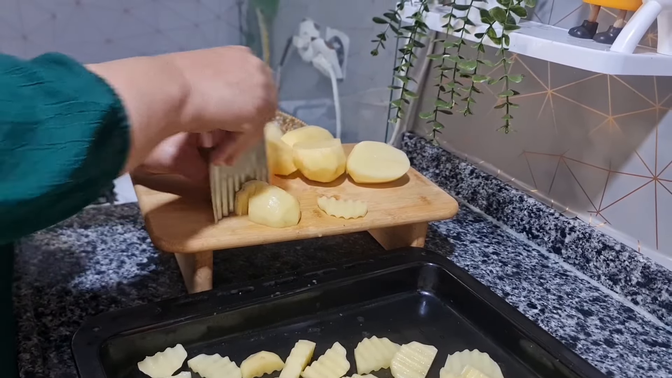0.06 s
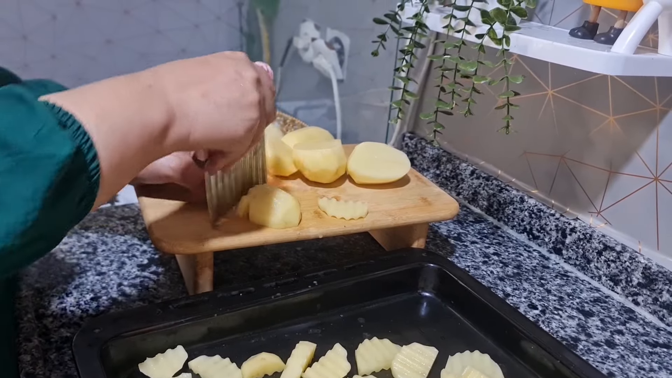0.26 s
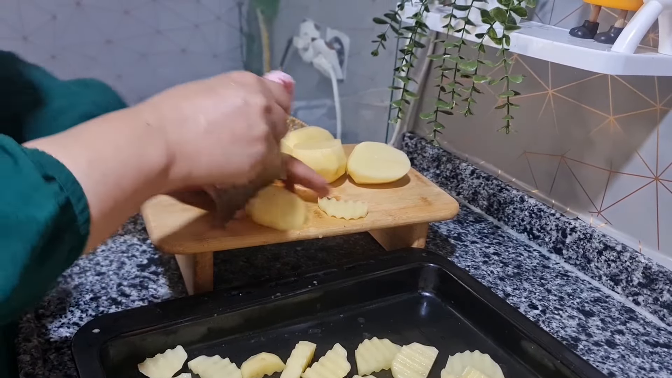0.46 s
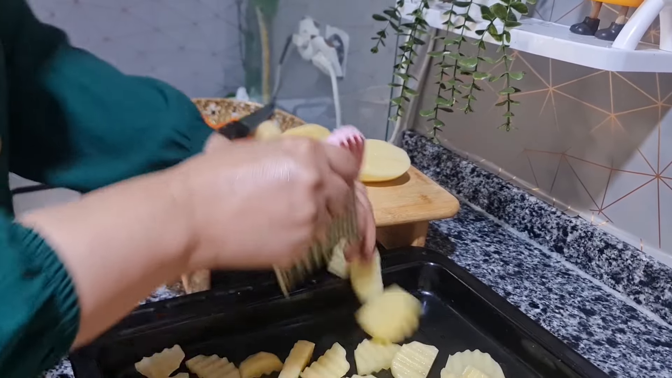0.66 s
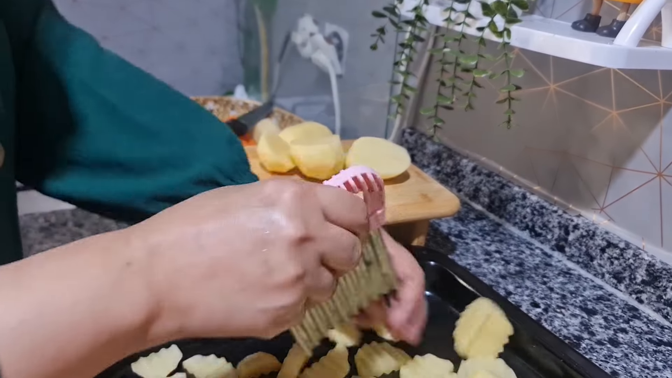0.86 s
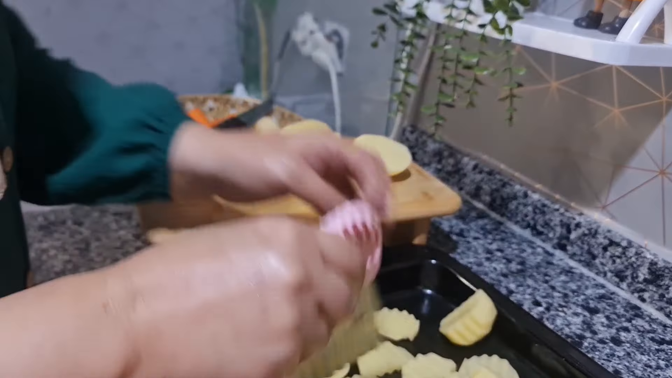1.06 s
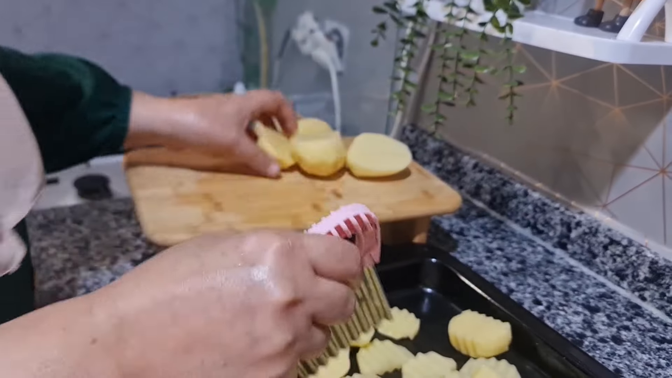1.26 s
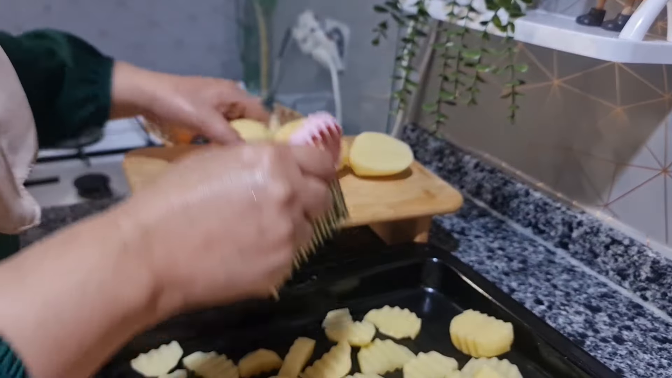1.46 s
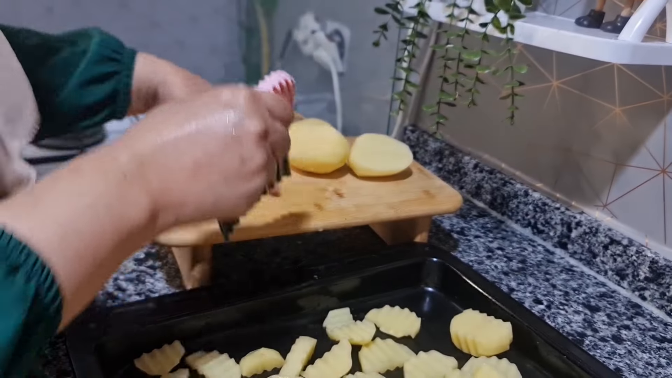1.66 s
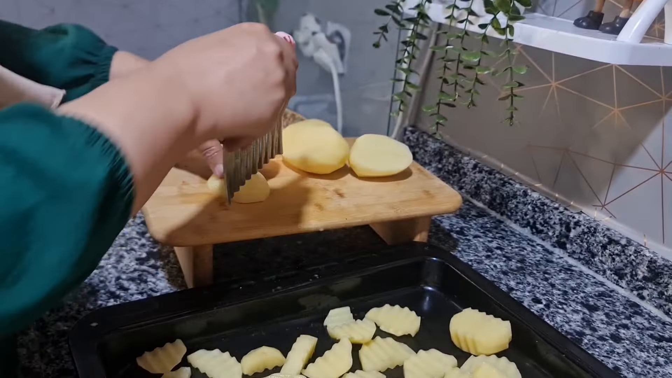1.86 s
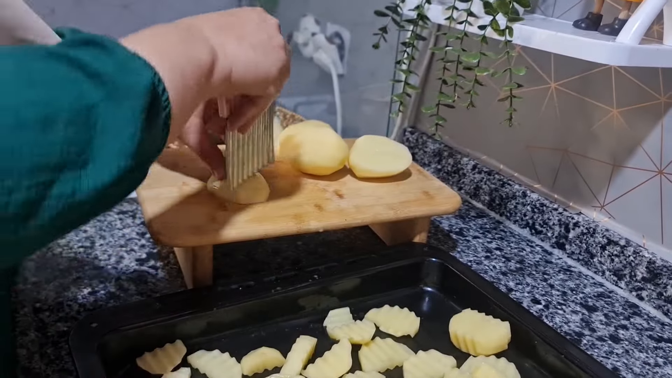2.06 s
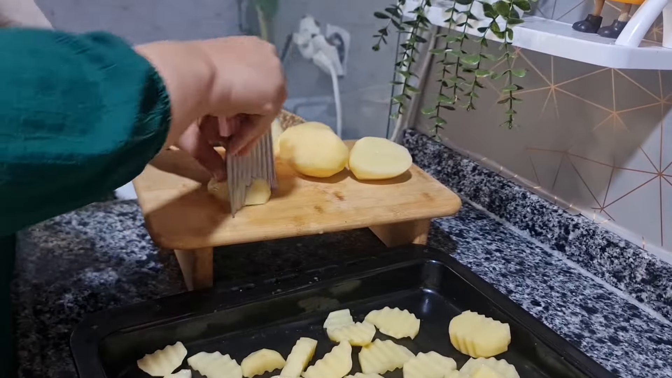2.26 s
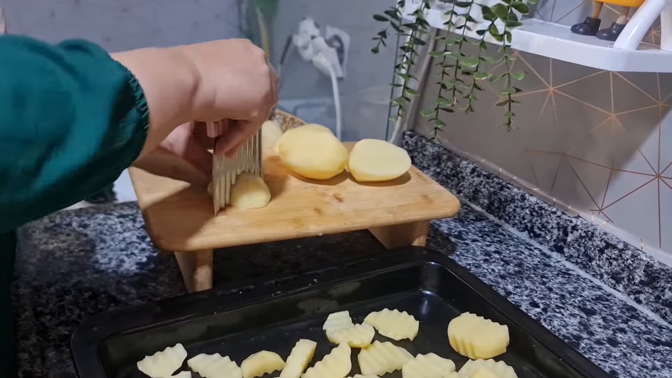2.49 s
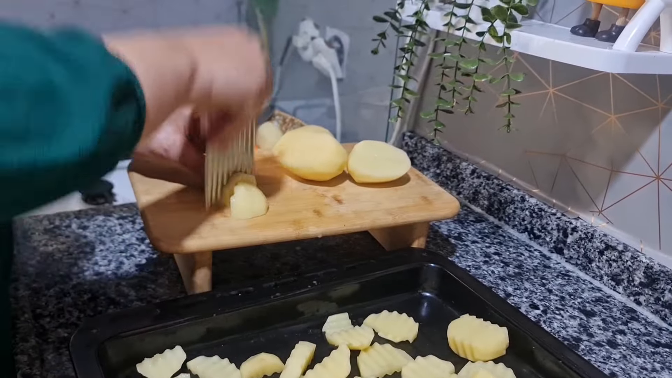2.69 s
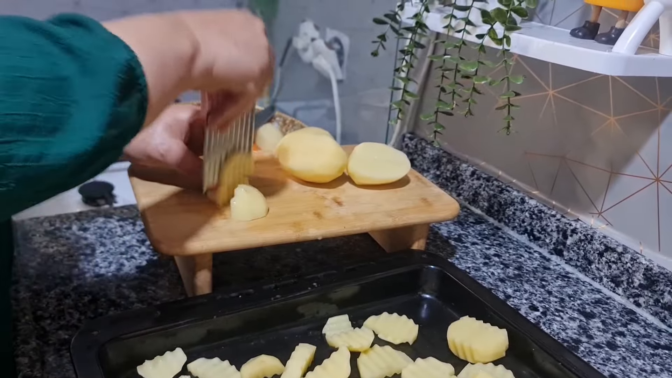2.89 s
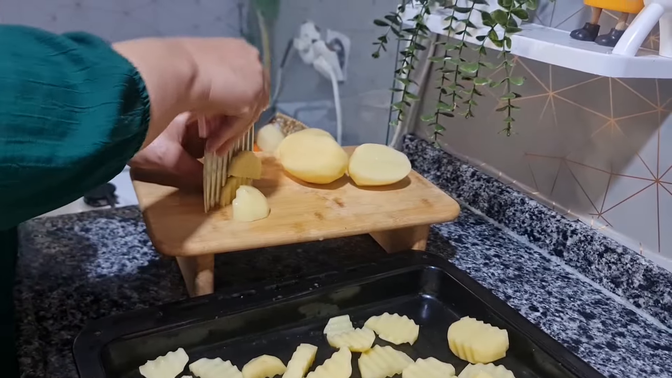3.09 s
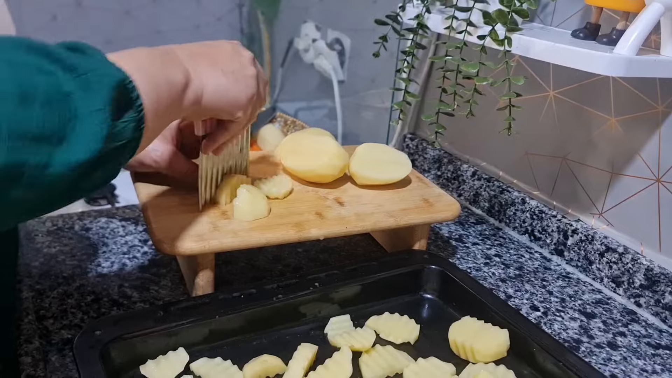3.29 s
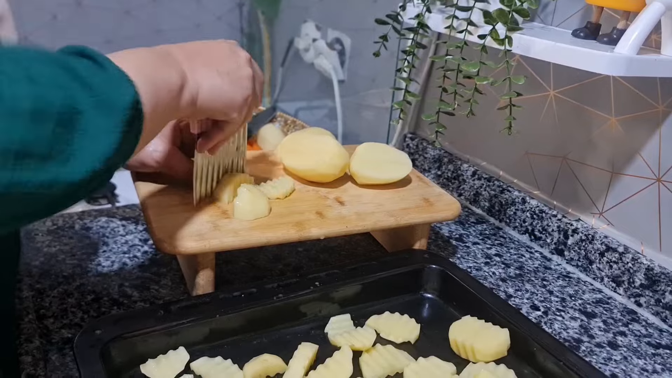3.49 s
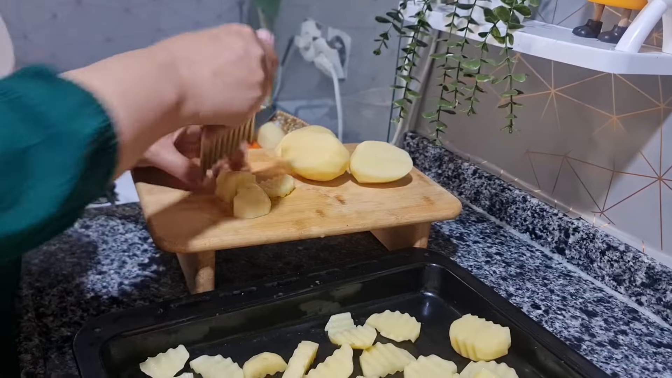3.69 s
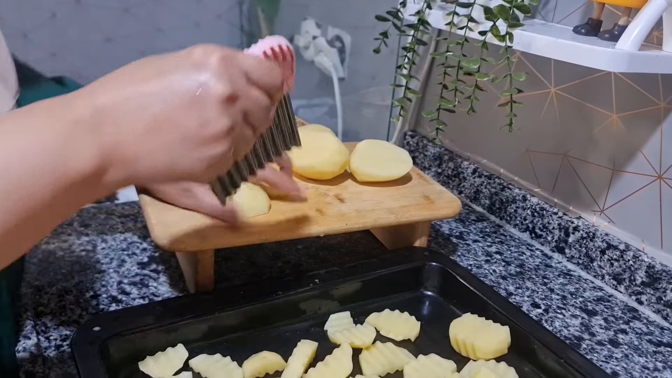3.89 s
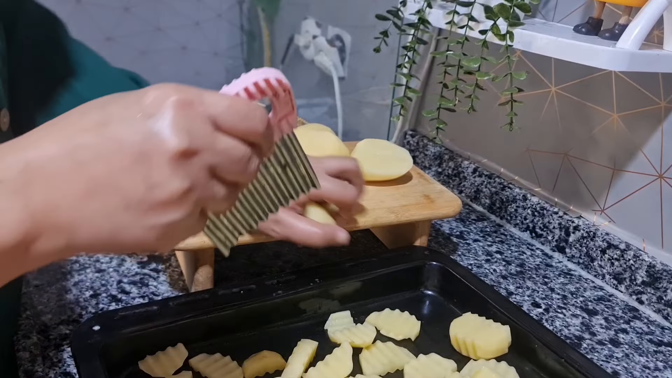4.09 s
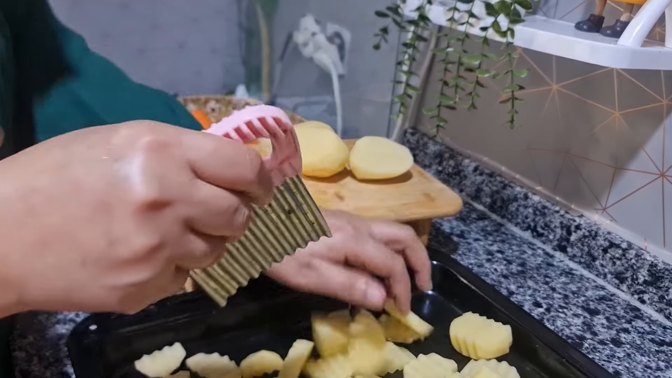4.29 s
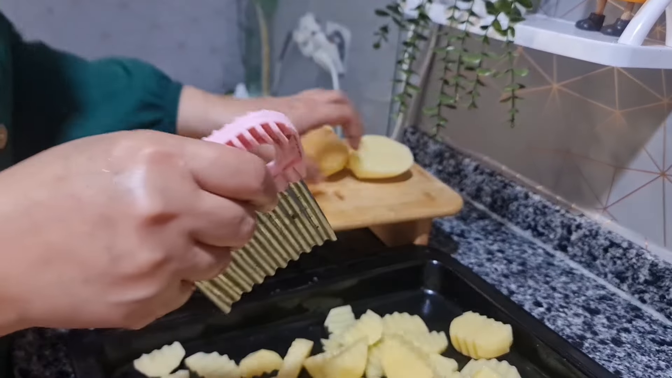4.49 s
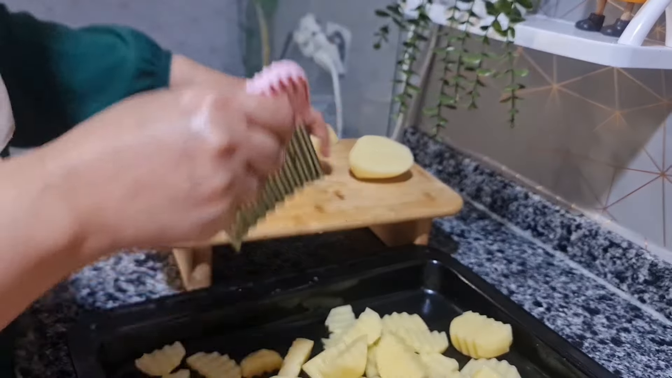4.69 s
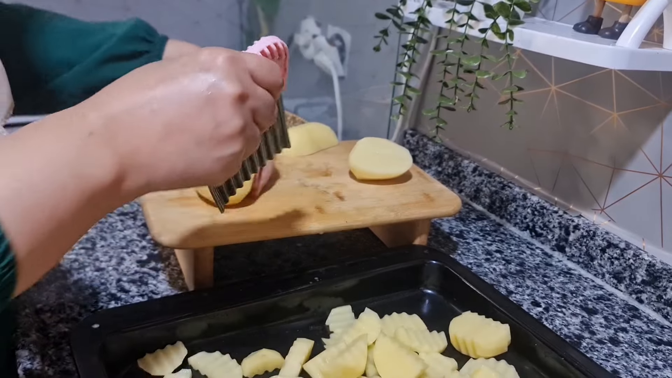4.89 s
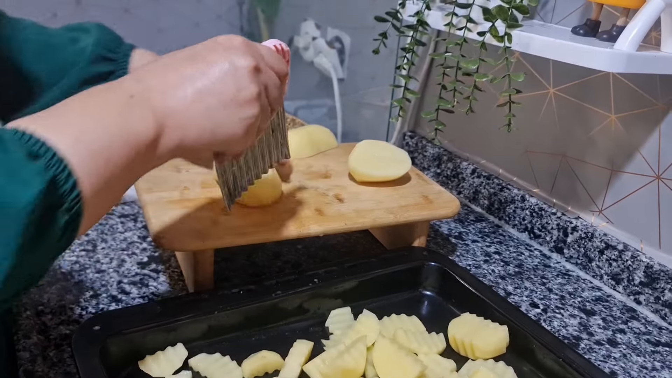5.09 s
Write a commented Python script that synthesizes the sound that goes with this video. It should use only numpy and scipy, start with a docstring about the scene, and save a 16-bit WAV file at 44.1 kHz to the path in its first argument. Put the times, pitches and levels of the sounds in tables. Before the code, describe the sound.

A crinkle cutter slices raw potato in six quick, crunchy cuts, each knocking on a wooden board in a small kitchen.

```python
"""Six quick, crunchy cuts, each ending in a knock on wood, sound in a small kitchen.
A crinkle cutter is slicing raw potato: the flesh tears in tiny bursts, then the blade hits
a wooden board that rings and rocks on its feet. Before and after, slices are scraped and
swept off the board and plop into a baking tray. A last, dull knock is the potato or cutter
being set down. Sleeves rustle over a faint hiss and rumble."""
import sys
import numpy as np
from scipy import signal
from scipy.fft import rfft, irfft, next_fast_len
from scipy.io import wavfile
from scipy.ndimage import uniform_filter1d, minimum_filter1d, map_coordinates

SR = 44100
rng = np.random.default_rng(int(sys.argv[2]) if len(sys.argv) > 2 else 0)


def to_wav(sig):
    """Store sig (one row per channel, or 1-D mono) as 16-bit WAV at the path in sys.argv[1].

    Samples outside -1..1 are clipped; the rate is SR.
    """
    pcm = np.clip(np.atleast_2d(sig), -1, 1) * 32767
    pcm = np.round(pcm).astype(np.int16)
    wavfile.write(sys.argv[1], SR, pcm.T)  # frames by channels


N = 227070
TIME = np.arange(N) / SR  # seconds since the scene began
AGE = np.arange(SR * 3 // 5) / SR  # seconds since a hit began

# Levels in dB are relative: filters and the mix shift them later. Fade time is the time to drop 60 dB.
# Knocks on the board: six end a cut, the last is the potato or cutter being set down. Each row: start
# in seconds, then level, extra wood tone, extra steel tone and left minus right, all in dB.
KNOCKS = [(2.2538, -19, 4, -12.5, 1), (2.5442, -22, 2, 0, 1), (2.8066, -18.5, -3, 2.5, 0.5),
          (3.0702, -21.5, -1.5, 3.5, 0.5), (3.3261, -20.5, -3, -5.5, 0), (3.5695, -20.5, 7.5, 0.5, 2.5),
          (5.0009, -28, 2, -20.5, 0)]
# The blade bites in and tears on. Each row: start in seconds, bite level in dB, crunch level in dB.
CUTS = [(2.207, -40.5, -32), (2.5, -36, -28.5), (2.767, -40.5, -25.5), (3.033, -38.5, -27),
        (3.294, -39, -30), (3.546, -51, -28.5)]
# Cutter and potato touch lightly on the board. Each row: start in seconds, level in dB.
TAPS = [(0.361, -44), (0.514, -49), (0.733, -44), (1.83, -48.5), (3.722, -41)]
# The cutter clacks as slices are shaken into the tray. Each row: start in seconds, level in dB.
CLACKS = [(-0.02, -32), (0.8165, -46.5), (0.9154, -39), (0.95, -37.5), (4.341, -47.5)]
# Short pitched sounds. Each row: start in seconds, level in dB, pitch in Hz, fade time in seconds.
BUMPS_AND_TICK = [(0.18, -61, 3100, 0.11), (0.734, -40, 275, 0.11), (0.764, -56, 1320, 0.057),
                  (0.819, -48, 2430, 0.025), (1.431, -40, 575, 0.1), (2.985, -47, 557, .13),
                  (3.015, -40.5, 750, 0.045), (3.253, -46.5, 507, .03), (3.496, -43.5, 530, 0.055),
                  (4.325, -43.5, 340, 0.14), (4.407, -48.5, 1090, .04), (4.434, -44.5, 1200, 0.045),
                  (4.656, -50.5, 474, 0.27), (4.742, -46, 580, 0.19)]  # soft bumps of slices, and a bright tick of the cutter
THUDS = [(0.733, -35.5, 129, 0.23), (4.986, -26.5, 141.5, 0.25)]  # a potato is pressed down
# Rubbing movements. Each row: start in seconds, length in seconds, level in dB.
SCRAPES = [(0.495, 0.1, -51), (0.566, 0.074, -32.5), (0.67, 0.21, -52.5)]  # blade on wood
RUSTLES = [(0.28, 0.32, -61), (1.046, 0.37, -61), (1.434, 0.094, -54.5), (1.68, 0.14, -60),
           (2.11, 0.16, -57.5), (4.274, 0.62, -59)]  # sleeves

# The tones of a struck object. Each row: pitch in Hz, level in dB, fade time in seconds.
BOARD_TONES = [(136.5, -13, 0.79), (399, 0, 0.28), (500.6, -3, 0.04), (545.3, 0.5, 0.25), (595.6, 3, 0.14),
               (717, 2.5, 0.16), (815, -2.5, 0.21), (1032, -0.5, 0.25), (1104, 11, 0.059),
               (1582, -1.5, 0.12), (1880, -3, 0.1), (2090, -2, 0.21), (2685, 1.5, .25), (2760, -8, 0.13),
               (2920, -9.5, 0.21), (2682, 7, 0.06), (2920, -10.5, 0.45), (2985, -26.5, 0.083),
               (2980, -4, 0.12), (3280, -9.5, 0.12), (4800, -9.5, 0.21), (6280, -15, .15)]  # board and blade together
CUTTER_TONES = [(1566, -1, 0.1), (2295, -0.5, 0.1), (2700, -0.5, 0.062), (3150, -2, 0.049)]  # the blade in the air
# The six bands of a hit: thump, wood, clack, blade, edge, fizz. Each row: low and high end in Hz.
BANDS = [(80, 320), (320, 900), (900, 2000), (2000, 4200), (4200, 7500), (7500, 15000)]
# The balance of each kind of hit. Each entry: level of one band in dB.
KNOCK_BANDS_DB = [-18, -1.5, 0, 3.5, -12, -39]
TAP_BANDS_DB = [-9, 0, -5, -11.5, -21, -23]
CLACK_BANDS_DB = [-15, -10, -2.5, -3, -29, -36]
# How a landing shifts that balance. Each entry: dB added to one band per dB of extra wood or steel.
WOOD_SHARE = [0, 1, 0, 0, 0, 0]  # a flat landing swells the wood band
STEEL_SHARE = [-0.51, 0.038, 0.1, 1.02, 1.5, 0.21]  # a hard-edged one trades thump for treble

# Tone colours: how strong the lows and highs of a sound are. Each row: frequency in Hz, level in dB.
HIT_COLOUR = [(60, -4.5), (150, -2.5), (215, -6), (330, -5.5), (400, 1.5), (900, -1), (1060, 1.5),
              (1260, -5), (1520, -3), (2000, -2.5), (2900, -1), (4500, 5), (6500, 10), (8500, -6),
              (15000, -4.5)]
TEAR_COLOUR = [(88, -25), (150, -7.5), (270, -24.5), (398, 1), (774, -1.5), (923, -22.5), (1080, -3),
               (1690, -14), (2220, -10.5), (5250, -14.5), (9820, -27.5), (14200, -28), (16000, -36)]
PRESS_COLOUR = [(80, -3.5), (150, -15.5), (250, -8), (330, -12.5), (400, -4), (560, -4.5), (800, -9),
                (1100, -15), (1600, -20.5), (5000, -38), (12000, -67)]
SCRAPE_COLOUR = [(120, -22), (250, -23.5), (520, -4.5), (880, -9.5), (1030, 0.5), (1250, -10.5),
                 (1650, -10.5), (2300, -14.5), (2900, -12), (4600, -21), (7400, -34.5), (10000, -40),
                 (16000, -44)]
SWEEP_COLOUR = [(150, -68), (250, -37), (282, -33), (360, -12.5), (414, 3), (501, -9), (557, -3),
                (640, -10), (735, -9), (1140, -14), (1310, -19.5), (3770, -17.5), (16000, -41.5)]
RUSTLE_COLOUR = [(200, -6.5), (450, 10), (1300, 1.5), (3000, 2.5), (5000, -4.5), (7100, -2.5), (7900, -22),
                 (15000, -19)]
AIR_COLOUR = [(20, 2.5), (58, 0), (146, -8), (200, -14.5), (300, -13), (420, -15), (600, -19.5),
              (1090, -20), (1700, -26.5), (2700, -24.5), (4200, -33.5), (7000, -41), (8000, -48.5),
              (16000, -51)]
RUMBLE_COLOUR = [(12, -38.5), (20, -12), (53, -10), (81, 8), (108, -1), (135, 8.5), (147, 1), (193, -22.5),
                 (220, -6), (290, -22.5), (480, -120)]
# The kitchen's echo. Each row: frequency in Hz, fade time in seconds.
ECHO_FADES = [(100, 0.39), (260, 0.4), (700, 0.31), (2800, 0.36), (5000, 0.25), (8000, 0.24), (12000, 0.17)]
# How alike left and right sound. Each row: frequency in Hz, likeness from 0 (unrelated) to 1 (same).
LIKENESS = [(100, 1), (300, 0.86), (600, 0.46), (1000, 0.14), (1600, 0.033), (4000, 0.018)]
# Which side is louder. Each row: frequency in Hz, left minus right in dB.
SIDE_BALANCE = [(100, -2), (300, -3), (600, -3), (1200, -2.5), (2600, -7), (5000, -7), (9000, 1.5),
                (14000, -1.5)]


def knocks():
    """The blade knocks on the wood after each cut; the last, dull knock is potato or cutter set down."""
    # each knock is two contacts: after a cut, the blade's tip and then its back end
    second_delay_s, second_db = 0.0115, -7.5
    track = np.zeros((2, N))
    for start, db, wood_db, steel_db, pan_db in KNOCKS:
        levels = db + np.array(KNOCK_BANDS_DB)
        levels += wood_db * np.array(WOOD_SHARE) + steel_db * np.array(STEEL_SHARE)
        pan = amp([[pan_db / 2], [-pan_db / 2]])
        for delay, contact_db in ((0, 0), (second_delay_s, second_db)):
            knock = hit(levels + contact_db, rise_s=0.0013, crack_fade_s=0.025,
                        scatter_db=-0.5, ring_db=-9.5, room_db=0.05)
            add(track, start + delay, knock * pan)
    return amp(-2) * track


def hit(levels, rise_s, crack_fade_s, scatter_db, ring_db, room_db):
    """One contact: a crack, its scatter off the counter, the ringing board and the room's echo."""
    # the wavy edge lands tooth by tooth, so the force takes a moment to build
    onset = rise(rise_s)
    crack = unit(stereo_noise(len(AGE)) * onset * fade(crack_fade_s))
    scatter = unit(stereo_noise(len(AGE)) * onset * fade(0.09))
    ring = unit(onset * board_ring())
    echo = unit(kitchen_echo())
    sound = crack + amp(scatter_db) * scatter + amp(ring_db) * ring + amp(room_db) * echo
    sound = coloured(sound, HIT_COLOUR)
    # turn each band up or down toward its wanted level over the first 40 ms
    head = SR // 25
    hz = np.fft.rfftfreq(head, 1 / SR)
    power = 2 * np.mean(np.abs(rfft(sound[:, :head]) / head) ** 2, axis=0)
    gains = []
    for (low, high), db in zip(BANDS, levels):
        band_db = 10 * np.log10(power[(hz >= low) & (hz < high)].sum())
        gains.append((np.sqrt(low * high), db - band_db))
    return coloured(sound, gains)


def board_ring():
    """Board and blade ring together in many fading tones, never quite the same way twice."""
    ring = np.zeros((2, len(AGE)))
    for hz, db, fade_s in BOARD_TONES:
        # high tones reach left and right out of step
        phase = rng.uniform(0, 2 * np.pi) + rng.standard_normal((2, 1)) * (1 - look_up(LIKENESS, hz))
        ring += amp(db + rng.standard_normal()) * fade(fade_s) * np.sin(2 * np.pi * hz * AGE + phase)
    return ring


def crunch():
    """The potato groans under the push, and its cells burst ahead of the sliding blade."""
    push = hand_pressure()
    groan = friction(push, PRESS_COLOUR, clicks_per_s=130, click_db=3.5, room_db=2)
    slide = friction(push, RUSTLE_COLOUR, clicks_per_s=960, click_db=-8, room_db=-1.5)
    cutting = sum(cut_swell(start, db) for start, _, db in CUTS)
    # the flesh gives way in clumps a few milliseconds long
    clumps = unit(amp(3 * wobble(points=1100, per_s=200)))
    tear = friction(cutting * clumps, TEAR_COLOUR, clicks_per_s=600, click_db=-1, room_db=4)
    return groan + amp(-13.5) * slide + amp(-0.5) * tear


def cut_swell(start, db):
    """Loudness of one cut: it grows as the blade speeds up and stops just after the landing."""
    swell_db, overrun_s = 11, 0.01
    landing = min(row[0] for row in KNOCKS if row[0] > start)
    full_speed = start + 0.94 * (landing - start)
    return loudness_curve([(start, db - swell_db), (full_speed, db), (landing + overrun_s, db)])


def hand_pressure():
    """Loudness of the hand's push: it builds, holds through the run of cuts and lets go."""
    light_db, firm_db = -67.5, -51
    build_s, hold_s, release_s = 0.17, 0.18, 0.11
    first = KNOCKS[0][0]
    let_go = KNOCKS[len(CUTS) - 1][0] + hold_s
    return loudness_curve([(first, light_db), (first + build_s, firm_db),
                           (let_go, firm_db), (let_go + release_s, light_db)])


def taps():
    """The cutter is set on the potato or bites into it with a light knock."""
    track = np.zeros((2, N))
    for start, db, *_ in TAPS + CUTS:
        tap = hit(db + np.array(TAP_BANDS_DB), rise_s=0.001, crack_fade_s=0.088,
                  scatter_db=-0.5, ring_db=-9, room_db=1)
        add(track, start, tap)
    return track


def clacks():
    """The cutter strikes the tray, and its steel blade rings briefly."""
    track = np.zeros((2, N))
    for start, db in CLACKS:
        clack = hit(db + np.array(CLACK_BANDS_DB), rise_s=0.001, crack_fade_s=0.022,
                    scatter_db=-4, ring_db=-14, room_db=0)
        for hz, tone_db, fade_s in CUTTER_TONES:
            phase = rng.uniform(0, 2 * np.pi, (2, 1))
            clack += amp(db + tone_db + 3.5) * fade(fade_s) * np.sin(2 * np.pi * hz * AGE + phase)
        add(track, start, clack)
    return track


def bumps_and_tick():
    """Soft bumps of slices and a bright tick of the cutter: short noise bursts with a rough pitch."""
    track = np.zeros((2, N))
    for start, db, hz, fade_s in BUMPS_AND_TICK:
        burst = unit(stereo_noise(len(AGE)) * fade(fade_s)) + amp(-1.5) * unit(kitchen_echo())
        band = signal.butter(2, [hz / 1.99, hz * 1.16], "bandpass", fs=SR, output="sos")
        pitched = signal.sosfilt(band, burst)
        opening_strength = np.std(pitched[:, :SR // 30])
        add(track, start, amp(db) * pitched / opening_strength)
    return track


def thuds():
    """A potato is pressed down, and the whole board swings on its feet with one low tone."""
    track = np.zeros((2, N))
    for start, db, hz, fade_s in THUDS:
        swing = amp(db) * rise(0.00083) * fade(fade_s) * np.sin(2 * np.pi * hz * AGE)
        add(track, start, np.tile(swing, (2, 1)))
    return track


def scrapes():
    """The blade drags over the wood, pushing slices together."""
    drag = sum(stroke(*row, roundness=1) for row in SCRAPES)
    return friction(drag, SCRAPE_COLOUR, clicks_per_s=880, click_db=-2, room_db=-2)


def sweep():
    """A hand brushes slices off the board."""
    brush = stroke(start_s=3.948, length_s=0.34, db=-53.5, roundness=0.7)
    return friction(brush, SWEEP_COLOUR, clicks_per_s=1700, click_db=-2, room_db=4)


def sleeves():
    """Cloth rustles as it catches and slips unevenly."""
    flutter = amp(0.5 * wobble(points=128, per_s=22))
    movement = flutter * sum(stroke(*row, roundness=0.4) for row in RUSTLES)
    return amp(-6.5) * friction(movement, RUSTLE_COLOUR, clicks_per_s=940, click_db=-5.5, room_db=11)


def background():
    """Quiet room air and a low, uneven rumble that swells as each knock rocks the board."""
    fall_db_per_s = 55
    air = amp(-56) * unit(coloured(stereo_noise(N), AIR_COLOUR))
    resting = amp(-57.5 + 3.1 * wobble(points=64, per_s=10))
    rocking = sum((TIME > start) * amp(db - 28 - fall_db_per_s * np.abs(TIME - start))
                  for start, db, *_ in KNOCKS)
    rumble = unit(coloured(stereo_noise(N), RUMBLE_COLOUR))
    return air + (resting + rocking) * rumble


def kitchen_echo():
    """Sound bouncing off the tiled walls: a tail of noise whose highest notes die first."""
    hz, seconds, spectrum = signal.stft(stereo_noise(len(AGE)), SR, nperseg=256)
    spectrum *= amp(-60 * seconds / look_up(ECHO_FADES, hz)[:, None])
    tail = signal.istft(spectrum, SR, nperseg=256)[1][:, :len(AGE)]
    return unit(tail * rise(0.00088)) / np.sqrt(len(AGE))


def friction(gain, colour, clicks_per_s, click_db, room_db):
    """Rubbing or tearing: tiny breaks and slips click over a smooth hiss, and the room echoes them."""
    clicks = (rng.random(N) < clicks_per_s / SR) * rng.standard_normal(N)
    rough_hiss = rng.standard_normal(N) + amp(click_db) * unit(clicks)
    direct = gain * unit(coloured(rough_hiss, colour))
    echo = signal.fftconvolve(direct[None], kitchen_echo(), axes=1)[:, :N]
    return (direct + amp(room_db) * echo) / np.sqrt(1 + amp(room_db) ** 2)


def stroke(start_s, length_s, db, roundness):
    """Loudness of one movement: it speeds up, peaks midway and slows down."""
    progress = np.clip((TIME - start_s) / length_s, 0, 1)
    return amp(db) * np.abs(np.sin(np.pi * progress)) ** roundness


def stereo_noise(n):
    """White noise whose left and right are alike in the bass and unrelated in the treble."""
    likeness = look_up(LIKENESS, np.fft.rfftfreq(n, 1 / SR))
    angle = np.arccos(np.clip(likeness, -1, 1)) / 2
    mid, side = irfft(rfft(rng.standard_normal((2, n))) * [np.cos(angle), np.sin(angle)], n)
    return np.array([mid + side, mid - side])


def coloured(sound, colour):
    """Filter a sound so its lows and highs follow the (Hz, dB) rows of a colour."""
    n = sound.shape[-1]
    size = 2 * next_fast_len(n // 2 + SR // 10)
    gain = amp(look_up(colour, np.fft.rfftfreq(size, 1 / SR)))
    # fold the filter forward in time, so nothing rings before a hit
    cepstrum = irfft(np.log(gain))
    cepstrum[1:size // 2] *= 2
    cepstrum[size // 2 + 1:] = 0
    return irfft(rfft(sound, size) * np.exp(rfft(cepstrum)), size)[..., :n]


def wobble(points, per_s):
    """A smooth curve through random values, passing per_s of them each second."""
    return map_coordinates(rng.standard_normal(points), [TIME * per_s])


def rise(seconds):
    """Climb from 0 toward 1, getting about two thirds of the way in this time."""
    return 1 - np.exp(-AGE / seconds)


def fade(seconds):
    """Die away, dropping 60 dB in this time."""
    return amp(-60 * AGE / seconds)


def loudness_curve(rows):
    """Join (seconds, dB) rows into a gain curve, silent before and after."""
    seconds, db = np.transpose(rows)
    return amp(np.interp(TIME, seconds, db, left=-120, right=-120))


def look_up(rows, hz):
    """Read between (Hz, value) rows on a logarithmic frequency scale."""
    row_hz, values = np.transpose(rows)
    return np.interp(np.log(hz + 1), np.log(row_hz + 1), values)


def amp(db):
    """Turn decibels into a gain to multiply by."""
    return 10 ** (np.asarray(db) / 20)


def unit(sound):
    """Scale a sound to an average strength (rms) of 1."""
    return sound / np.sqrt(np.mean(sound ** 2) + 1e-20)


def add(track, start_s, sound):
    """Mix a stereo sound into the track, trimming whatever sticks out at either end."""
    start = round(start_s * SR)
    sound = sound[:, max(0, -start):]
    part = track[:, max(0, start):][:, :sound.shape[1]]
    part += sound[:, :part.shape[1]]


def scene():
    """Mix all the sources, then give left and right their own tone colour."""
    hits = knocks() + taps() + clacks() + bumps_and_tick() + thuds()
    left, right = hits + crunch() + scrapes() + sweep() + sleeves() + background()
    return np.array([coloured(left, [(hz, db / 2) for hz, db in SIDE_BALANCE]),
                     coloured(right, [(hz, -db / 2) for hz, db in SIDE_BALANCE])])


def record(dry):
    """Hold down the loudest peaks, fade both ends and cut the very highest treble."""
    ceiling, edge_s, top_hz = 0.88, 0.004, 16000
    needed_gain = ceiling / np.maximum(np.abs(dry).max(axis=0), ceiling)
    smooth_gain = uniform_filter1d(minimum_filter1d(needed_gain, size=133), size=89)
    edges = np.minimum(np.minimum(TIME, TIME[::-1]) / edge_s, 1)
    lowpass = signal.ellip(10, 0.1, 80, top_hz, fs=SR, output="sos")
    return signal.sosfilt(lowpass, dry * smooth_gain * edges)


dry = scene()
out = record(dry)
to_wav(out)
```